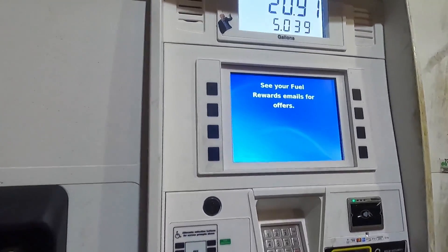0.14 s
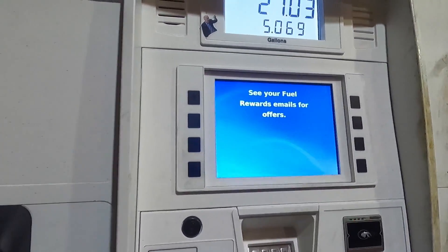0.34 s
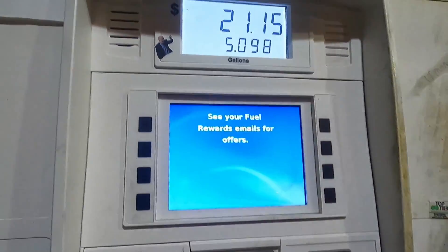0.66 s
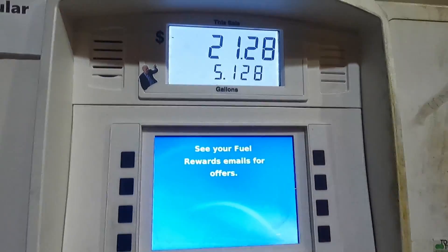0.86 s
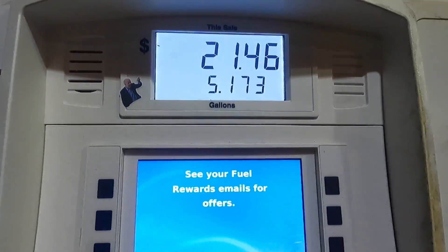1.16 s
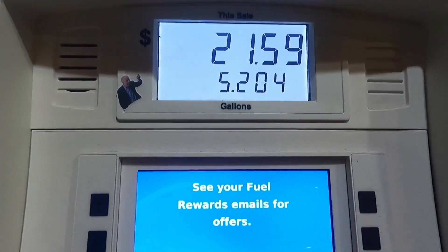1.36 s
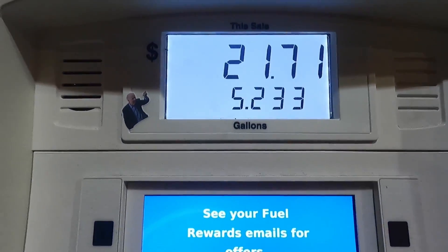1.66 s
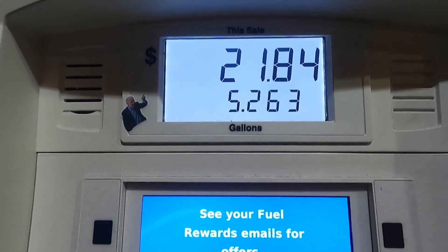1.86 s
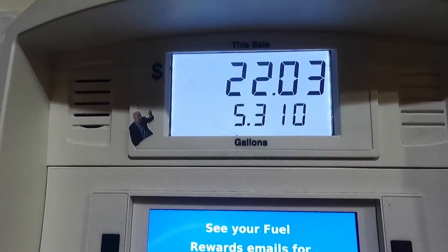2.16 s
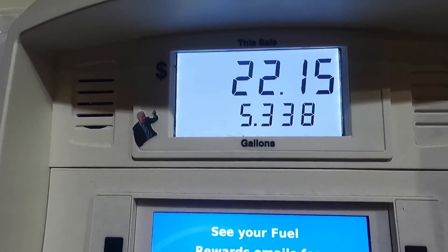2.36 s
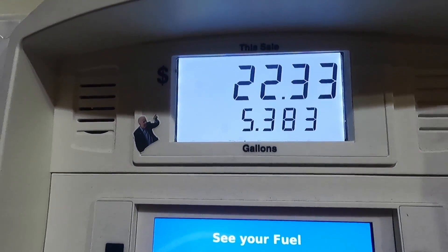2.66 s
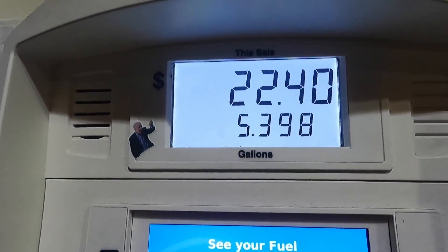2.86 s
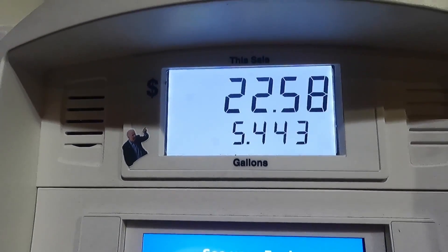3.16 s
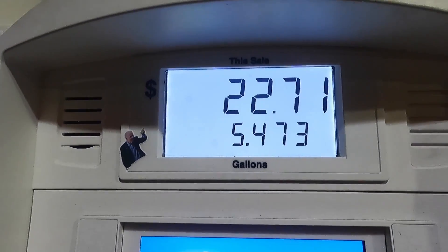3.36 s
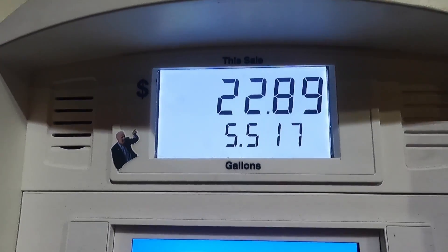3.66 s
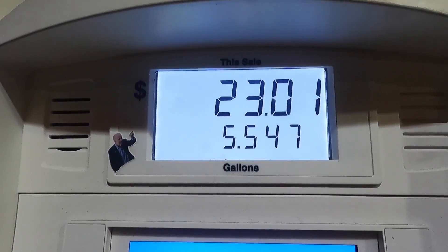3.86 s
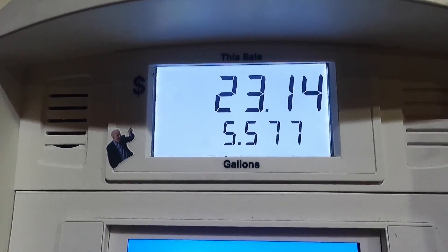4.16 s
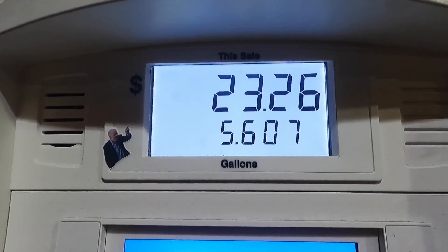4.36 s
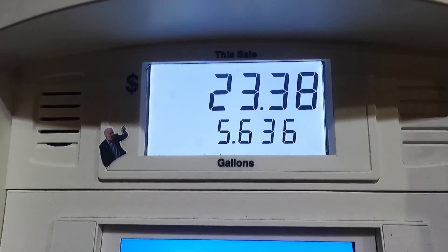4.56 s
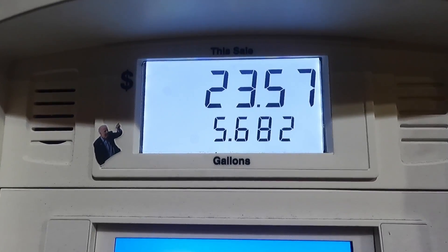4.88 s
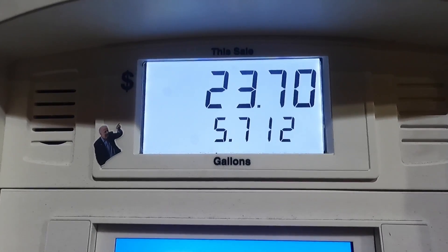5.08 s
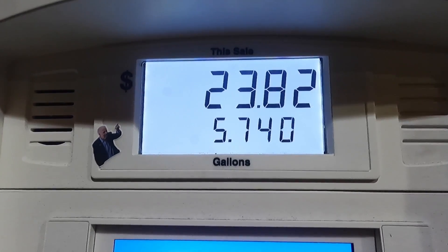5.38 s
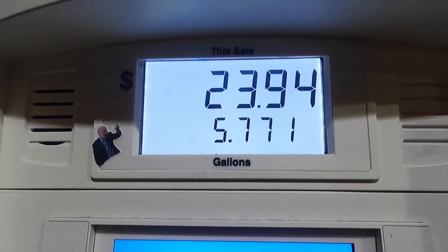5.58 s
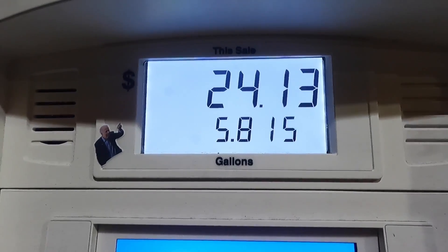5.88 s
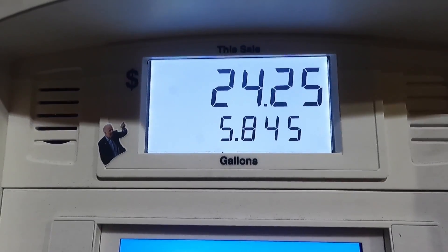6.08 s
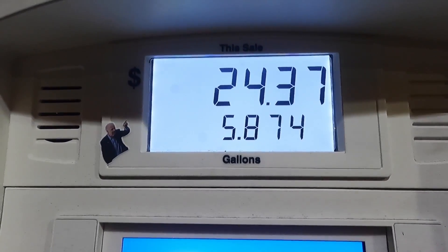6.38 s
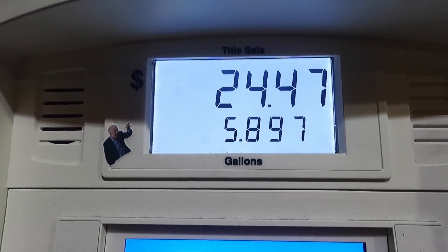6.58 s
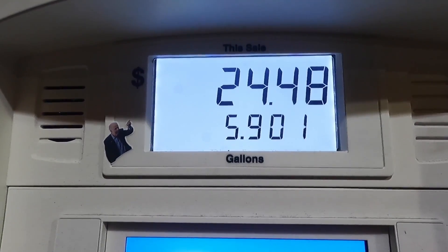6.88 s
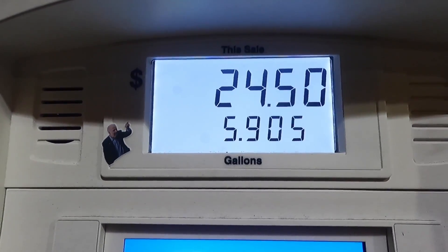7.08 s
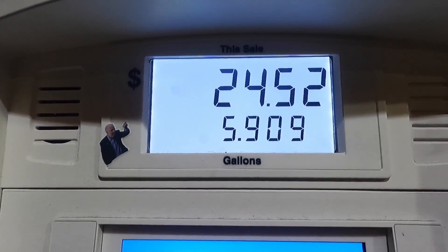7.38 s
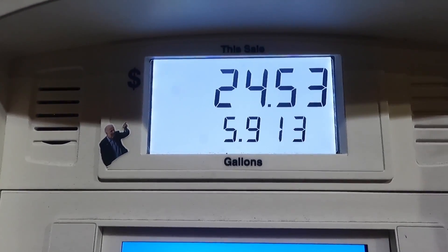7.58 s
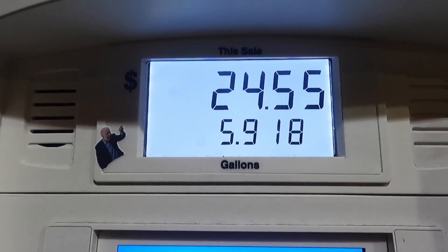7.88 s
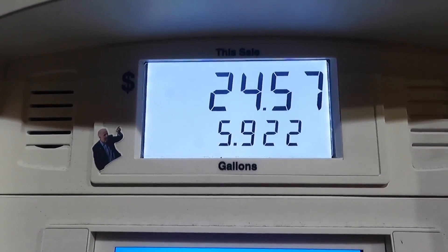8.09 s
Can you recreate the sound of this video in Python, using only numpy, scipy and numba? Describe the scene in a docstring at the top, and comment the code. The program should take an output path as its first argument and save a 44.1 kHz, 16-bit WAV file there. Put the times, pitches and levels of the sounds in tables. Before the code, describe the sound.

Low exhaust throbbing dominates, with soft fuel flow ringing through pipes close by. The engine slowly rises while a leak ticks, falls back into uneven thumps, and immediately revs again, louder and rougher with sharp metallic spits. Near the end the fuel flow narrows to a thin hiss, the throttle closes and the engine sputters down in loose chugs. Outdoor canopy, short reflections, muted distant rumble, close stereo pickup.

```python
"""Fuel pump beside a revving engine

A petrol pump fills a tank while a deep engine nearby revs up twice, dropping back into a lumpy burble each time.
The drone is a sum of orders of the four-stroke cycle, shaped by the pipe's resonances.
An exhaust leak lets out noise puffs, one tick a cycle at first, two spits a cycle in the second, harder pull.
Fuel noise rings the pipework and filler neck until the valve throttles to a thin hiss.
Coloured noise gives the station behind, and short noise bursts give two dull knocks on a panel."""
import sys
import numpy as np
from scipy import signal
from scipy.fft import rfft, irfft, next_fast_len
from scipy.io import wavfile
from scipy.ndimage import uniform_filter1d, map_coordinates
from numba import njit

SR = 44100
rng = np.random.default_rng(int(sys.argv[2]) if len(sys.argv) > 2 else 0)


def persist_wave(psi):
    """Save psi, clipped to +-1, as 16-bit WAV."""
    counts = np.round(np.clip(psi, -1, 1) * 32767).astype(np.int16)
    wavfile.write(sys.argv[1], SR, np.atleast_2d(counts).T)


N = 363384
T = np.arange(N) / SR  # time axis in s

# cylinders heard at the leak: place_in_cycle (0-1), tight_db, blowing_db
LEAKS = [(.02, 0, -17), (.18, -12, 0), (.42, -11, -15), (.745, -22, -1)]
# pulls on the throttle: opens_s, closes_s, drone_db, gas_db, blow_by (0-1), drone_fade_db_per_s once closed
PULLS = [(-.2, 3.54, -20, -50.5, 0.12, 21), (4.071, 6.87, -19.5, -39, 0.86, 32)]
OPEN_S = 0.073  # time the throttle takes to open


def undb(db):
    """Decibels to amplitude ratio."""
    return 10 ** (np.asarray(db) / 20)


def unit(x):
    """Normalise to an rms amplitude of 1."""
    return x / np.sqrt(np.mean(x ** 2))


def curves(table):
    """Linear interpolation of each column over the times in the first."""
    s, *columns = np.transpose(table)
    return [np.interp(T, s, c) for c in columns]


def response(hz, points):
    """Magnitude response interpolated in dB over log frequency."""
    f, db = np.transpose(points)
    return undb(np.interp(np.log(hz + 1e-9), np.log(f), db))


def colour(x, points):
    """Zero-phase filtering: the spectrum is multiplied by a magnitude response."""
    size = next_fast_len(N + 8192)
    gain = response(np.fft.rfftfreq(size, 1 / SR), points)
    return irfft(rfft(x, size) * gain, size)[..., :N]


def noise(like):
    """White noise in two channels whose correlation (0-1) is set by the mid and side shares."""
    mid, side = rng.standard_normal((2, N))
    like = np.clip(like, 0, 1)
    return np.sqrt((1 + like) / 2) * mid + np.sqrt((1 - like) / 2) * np.array([side, -side])


def walk(rate):
    """Slow random drift: cubic interpolation through random values, `rate` of them a second."""
    steps = rng.standard_normal(1024)
    drift = map_coordinates(steps, [T[::64] * rate], order=3, mode="wrap")
    return drift.repeat(64)[:N]


def ramp(start_s, length_s):
    """Linear rise from 0 to 1, held there afterwards."""
    return np.clip((T - start_s) / length_s, 0, 1)


def swell(s, half_s):
    """Gaussian hump of height 1, down to 1/e at half_s from its centre."""
    return np.exp(-((T - s) / half_s) ** 2)


def ring(x, decay_s):
    """Exponential decay: a one-pole filter gives every impulse a tail."""
    return signal.lfilter([1], [1, -np.exp(-1 / (decay_s * SR))], x + 1e-18)


def even(x, span_s):
    """Level equalisation: divide by the running rms, leaving pulses shorter than the span."""
    power = np.mean(np.atleast_2d(x) ** 2, axis=0)
    size = int(span_s * SR)
    return x / np.sqrt(uniform_filter1d(uniform_filter1d(power, size), size) + 1e-18)


def pulses(phase, scatter_db):
    """Pulse train: an impulse of random size at each whole turn of the phase."""
    at = np.flatnonzero(np.diff(np.floor(phase)) > 0)
    out = np.zeros(N)
    out[at] = undb(scatter_db * rng.uniform(-1.2, 1, 4096)[:len(at)])
    return out


@njit
def resonate(x, hz, width):
    """Second-order resonance: a state-variable band-pass with a moving centre."""
    y, band, low = np.empty(len(x)), 0., 0.
    for i in range(len(x)):
        g, k = np.tan(np.pi * hz[i] / SR), width / hz[i]
        v = (band + g * (x[i] - low)) / (1 + g * (g + k))
        band, low, y[i] = 2 * v - band, low + 2 * g * v, k * v
    return y


def steep(x, hz, width):
    """Cascaded resonance: each channel passes the same band-pass twice, at rms 1."""
    hz = hz * np.ones(N)
    return unit(np.array([resonate(resonate(c, hz, width), hz, width) for c in x]))


def station():
    """Diffuse background: distant traffic and machinery under the canopy blend into coloured noise."""
    # colour of the background: freq_hz, level_db
    wash = [(88, -20.5), (150, -7), (190, -11.5), (260, -19), (360, -13.5), (450, -23), (621, -22),
            (853, -22.5), (1150, -22), (2250, -38), (3910, -41.5), (7250, -51), (8150, -56.5),
            (10600, -73.5), (17900, -120)]
    return undb(-41.5 + 1.7 * walk(7.6)) * unit(colour(noise(like=0.88), wash))


def air():
    """Local turbulence: air stirring at the microphone ports gives uncorrelated low rumble."""
    # colour of the moving air: freq_hz, level_db
    rumble = [(15, 6), (30, -5.5), (70, 0.5), (150, -11), (400, -24.5), (2000, -83.5)]
    return undb(-56) * unit(colour(noise(like=0), rumble))


def knocks():
    """Impact excitation: decaying bursts of the panel's resonances, dull because it is struck softly."""
    # faint knocks: start_s, level_db
    strikes = [(2.487, -18), (2.796, -21.5)]
    # panel resonances: freq_hz, width_hz, level_db
    panel = [(487, 160, -4), (870, 210, 2), (1090, 220, -6), (1650, 1200, -2)]
    blows = np.zeros(N)
    for s, db in strikes:
        blows[int(s * SR)] = undb(db - 14.0)
    modes = unit(sum(undb(db) * steep(noise(like=0.77), hz, width) for hz, width, db in panel))
    rung = ring(blows, decay_s=0.018) * modes
    return signal.sosfilt(signal.butter(2, 2800, fs=SR, output="sos"), rung)


def pump():
    """Flow noise: turbulent fuel rings pipework and filler neck; the valve closes and hisses higher."""
    # the fill: time_s, rush_db in the pipework, neck_db of the air in the neck, neck_hz
    fill = [(0, -47, -47, 566), (.35, -42, -43.5, 547), (.8, -39.5, -45.5, 522), (1.5, -44.5, -41, 700),
            (2.6, -45, -43, 721), (3.7, -38.5, -43.5, 747), (4.5, -41, -43.5, 782), (5.3, -41.5, -43, 901),
            (6.1, -37, -44, 905), (6.5, -39, -51, 896)]
    # resonances of the throttled valve: freq_hz, width_hz, level_db
    valve = [(605, 56, -3), (800, 660, 2.5), (1156, 210, 1.5), (2220, 1600, -7)]
    valve_s, close_s = 6.47, .08  # start and length of the closing
    pan_db = 5  # hiss, left minus right
    shut = ramp(valve_s, close_s)
    rush_db, neck_db, neck_hz = curves(fill)
    rush = undb(rush_db + 1.3 * walk(25)) * steep(noise(like=0.94), 621, width=204)
    neck_hz = neck_hz * (1 + 0.018 * walk(9.8))
    neck = undb(neck_db + 1.6 * walk(40)) * steep(noise(like=0.99), neck_hz, width=173)
    hiss = unit(sum(undb(db) * steep(noise(like=0.5), f, w) for f, w, db in valve))
    hiss = hiss * undb(np.array([[pan_db], [-pan_db]]) / 2)
    hiss_db = -45.0 + 1.0 * (T - valve_s) + .4 * walk(3.2)  # grows by 1 dB a second
    return (1 - shut) * (rush + neck) + shut * undb(hiss_db) * hiss


def throttle():
    """Source control: each pull opens, holds and closes; drone and gas decay until the next takes over."""
    close_s = 0.2  # time the throttle takes to close
    drone_shut_db, gas_shut_db, gas_fade_db_per_s = -8, -3.5, 17.5
    build_from_db, build_s = -2, 0.11  # the leak starts weaker and builds up
    opening = blow = drone_gain = gas_gain = 0
    for opens, closes, drone_db, gas_db, blow_by, fade_db in PULLS:
        on, shut = ramp(opens, OPEN_S), ramp(closes, close_s)
        since = np.maximum(T - closes, 0)
        opening = opening + on * (1 - shut - opening)
        blow = blow + on * (blow_by * (1 - shut / 2) - blow)
        drone_level = undb(drone_db + drone_shut_db * shut - fade_db * since)
        drone_gain = drone_gain + on * (drone_level - drone_gain)
        build_db = build_from_db * np.exp(-np.maximum(T - opens, 0) / build_s)
        gas_level = undb(gas_db + build_db + gas_shut_db * shut - gas_fade_db_per_s * since)
        gas_gain = gas_gain + on * (gas_level - gas_gain)
    return opening, np.clip(blow, 0, 1), drone_gain, gas_gain


def coasting():
    """Overrun time: seconds since the throttle last began to close, zero during a pull."""
    out = np.zeros(N)
    for opens, closes, *_ in PULLS:
        out = out + ramp(opens, OPEN_S) * (np.maximum(T - closes, 0) - out)
    return out


def chugs():
    """Single-mode ringing: each overrun chug is a hump of one tone whose pitch moves from chug to chug."""
    # heavy chugs: centre_s, level_db, pitch_hz
    thumps = [(3.58, -19, 84), (3.655, -15, 77.7), (3.75, -14.5, 75.2), (3.83, -19.5, 68.2),
              (3.895, -12, 64.3), (3.974, -11.5, 56.2), (4.05, -15.5, 55.4), (4.109, -13.5, 57.4),
              (7.04, -20, 78.1), (7.12, -18, 77.7), (7.196, -28, 71.94), (7.33, -12.5, 69.56),
              (7.41, -22.5, 72), (7.47, -22, 56.46), (7.536, -15, 58), (7.63, -16, 65.85),
              (7.745, -18, 68.9), (7.83, -25, 62), (7.94, -23.5, 68.3), (8.09, -23, 57.8), (8.16, -24, 66)]
    times, _, pitches = np.transpose(thumps)
    turns = np.cumsum(np.interp(T, times, pitches)) / SR + rng.uniform()
    envelope = sum(undb(db) * swell(s, half_s=0.029) for s, db, _ in thumps)
    return envelope * np.sin(2 * np.pi * turns)


def burble(cycle):
    """Irregular pulse train: eight firings a cycle, of stray size and timing, excite the pipe."""
    # the pipe rung by stray firings: freq_hz, gain_db
    pipe = [(15, -50), (25, -23.5), (46, -3), (65, 0), (80, 1.5), (95, -2), (129, -10), (177, -11),
            (231, -17), (358, -26.5), (450, -44.5), (580, -74), (990, -120)]
    firings = pulses(8 * cycle + .25 * walk(70), scatter_db=1.5)
    gusts = ring(firings, decay_s=0.01) * rng.standard_normal(N)
    return even(colour(gusts, pipe), span_s=0.028)


def wall(gas, dull):
    """Structural resonance: the pipe wall adds its modes to the gas; weak pressure dulls the treble."""
    # wall resonances round the leak: freq_hz, width_hz, level_db
    modes = [(1720, 360, -6), (3650, 100, -11), (3000, 19, -11.5), (4174, 120, -4.5), (4660, 110, -4),
             (4840, 24, -5), (5860, 81, -3.5), (6920, 18, 0)]
    rung = gas
    for hz, width, db in modes:
        rung = rung + undb(db) * np.array([resonate(c, np.full(N, float(hz)), width) for c in gas])
    soft = signal.sosfiltfilt(signal.butter(2, 4480, fs=SR, output="sos"), rung)
    return unit(rung + np.clip(dull, 0, 1) * (soft - rung))


def echoes(x, count=7):
    """Comb filtering: early reflections off the car and pump housing, at slowly swaying lags."""
    first_s, last_s, drift_s, echo_db = .0012, .011, .0003, -14  # each echo has this level
    out = x
    for lag_s in rng.uniform(first_s, last_s, count):
        late = T - lag_s - drift_s * walk(2)
        out = out + undb(echo_db) * np.array([np.interp(late, T, c) for c in x])
    return unit(out)


def chinks(puffs, ring_hz, spread=0.423, count=6):
    """Modal ringing: every puff rings the thin metal at random pitches, the highest weakest."""
    t = np.arange(1024) / SR
    out = np.zeros(N + 1024)
    shape = np.exp(-t / .0034) * (1 - np.exp(-t / .0006))
    at = np.flatnonzero(puffs)
    for i, chance in zip(at, rng.standard_normal((len(at), count, 1))):
        hz = ring_hz[i] * np.exp(spread * np.tanh(chance))
        size = 1 / (1 + (hz / 6800) ** 10)
        out[i:i + len(t)] += puffs[i] * shape * np.sum(size * np.sin(2 * np.pi * hz * t), axis=0)
    return unit(out[:N])


def leak(cycle, blow, load):
    """Pulsed jet noise: each leaking cylinder lets out a short puff, trailed by the canopy's longer tail."""
    # colour of the gas when tight: freq_hz, level_db
    tick = [(590, -49), (1000, -10.5), (1560, -3.5), (2700, -9.5), (3510, -8.5), (4150, -12.5),
            (5540, -20.5), (6960, -21), (8150, -32), (10600, -38), (17900, -120)]
    # colour of the gas when blowing: freq_hz, level_db
    spit = [(590, -19), (1000, -3.5), (1510, -9), (1830, -6), (2490, -6), (2700, -3), (4860, -4),
            (5840, -10.5), (6430, -17.5), (6960, -11.5), (8150, -25.5), (10600, -38.5), (17900, -120)]
    puffs = 0
    for place, tight_db, blowing_db in LEAKS:
        size = undb(tight_db + blow * (blowing_db - tight_db))
        puffs = puffs + pulses(cycle - place, scatter_db=2.1) * size
    direct = unit(ring(ring(puffs, decay_s=.0042), decay_s=.001))
    tail = unit(ring(ring(puffs, decay_s=0.018), decay_s=0.00093))
    # powers add: direct puffs, their tail (weaker under load) and a steady hiss
    envelope = np.sqrt(direct ** 2 + (undb(6 - 5 * load) * tail) ** 2 + undb(0.5) ** 2)
    gas = envelope * noise(like=0.51)
    gas = (1 - blow) * unit(colour(gas, tick)) + blow * unit(colour(gas, spit))
    ring_hz = 3661 + 1313 * load ** 2 * blow  # the metal's pitch rises with load and blow-by
    metal = undb(-7.5 + 4 * load) * chinks(puffs, ring_hz)
    return even(gas + metal, span_s=0.47)


def spits(crack_db=-14.0, ring_db=-9.5, decay_s=0.0051):
    """Transient jet: a hard puff is a crack coloured by the pipe wall, two rings of metal and a canopy tail."""
    # the sharpest spits: start_s, level_db, ring_hz
    bursts = [(0.8478, -34, 3100), (1.0151, -44, 2290), (1.1862, -36, 2200), (1.352, -33, 4000),
              (1.4336, -34, 4400), (1.5145, -36, 4220), (1.597, -26, 3620), (1.758, -40, 4400),
              (1.8367, -43, 4200), (1.994, -37, 4140), (2.0715, -31.5, 2560), (2.1454, -35, 2540),
              (2.295, -35, 2560), (2.368, -32.5, 3370), (2.856, -31.5, 3770), (3.056, -32, 3560),
              (4.301, -24, 5230), (4.655, -25, 3770), (5.205, -25, 4500), (5.4934, -23, 4220),
              (5.721, -17.5, 5670), (5.8714, -18.5, 4980), (6.1799, -23, 5180), (6.236, -22.5, 3000),
              (6.4573, -18, 5310), (6.512, -14.5, 4320), (6.544, -17, 4920), (6.567, -15.5, 5020),
              (6.5987, -17, 4730), (6.621, -16, 4800), (6.6523, -17, 5060), (6.676, -16.5, 3360),
              (6.7056, -19, 4780), (6.783, -20, 5000), (6.919, -27, 3880), (6.941, -25, 3450),
              (6.9688, -22, 3830), (6.9905, -25, 3170), (7.0165, -26, 3580), (7.0379, -33, 3215),
              (7.1402, -39, 2260), (7.2659, -33, 2840), (7.319, -32, 5000), (7.3746, -29.5, 2780),
              (7.394, -33, 3260), (7.4325, -31, 2293), (7.4869, -32.5, 2230), (7.549, -38, 2490),
              (7.675, -35.5, 4506)]
    # colour of the crack: freq_hz, level_db
    crack_colour = [(1000, -33), (2500, -5.5), (5000, 4.5), (7500, -6), (8600, -17.5), (12000, -30),
                    (15000, -49)]
    tail_db, tail_s = -13.5, 0.025
    upper_ratio, upper_db = 1.27, -7.5  # second ring of the metal
    crack = wall(colour(noise(like=0.8), crack_colour), dull=0)
    out = np.zeros((2, N))
    t = np.arange(4096) / SR
    attack = 1 - np.exp(-t / .0003)
    burst = attack * np.exp(-t / decay_s)
    tail = attack * undb(tail_db) * np.exp(-t / tail_s)
    for s, db, hz in bursts:
        at = slice(int(s * SR), int(s * SR) + len(t))
        metal = np.sin(2 * np.pi * hz * t) + undb(upper_db) * np.sin(2 * np.pi * hz * upper_ratio * t)
        snap = undb(crack_db) * np.hypot(burst, tail) * crack[:, at]
        out[:, at] += undb(db) * (snap + undb(ring_db) * burst * metal)
    return out


def drone(hz, cycle, load, blow, smear=0.1624):
    """Source and filter: orders of the firing cycle slide through the fixed resonances of the pipe."""
    # lopsided firing: order (multiple of cycle rate), idle_db, third_load_db, two_thirds_load_db, full_load_db
    firing = [(2, -3, -5.5, -3.5, 6.5), (3, 4, 9, 1, 1.5), (4, -0.5, 6.5, 8, 9), (5, 16.5, 13, 8, -3.5),
              (6, -9.5, -4, -27.5, -22.5), (7, 4, -8, -3, -5.5), (8, -23, -7.5, -12, -19.5),
              (9, -14.5, -8.5, -0.5, 0.0), (10, -13, -5.5, -22, -7), (11, -14.5, -10.5, -9.5, 7.5),
              (12, -14, -3.5, -6, 9), (13, -20, -10, -9, -9.5), (14, -6.5, -3, 5.5, 5),
              (15, -20.5, 5.5, -4.5, 2), (16, -12.0, -10.5, -10, 7.0), (17, -9.5, -2.5, 1.5, 4.5),
              (18, -11.5, -1, -8.5, -2.5), (19, -14, 1, -12.5, -0.5), (20, -12.5, -4.5, -5.5, 5.5)]
    # exhaust pipe response: freq_hz, gain_db
    pipe = [(25.0, -32), (45.0, -21.0), (58.0, -9.5), (70.0, -7), (80.0, -8), (92.0, -2.5), (105.0, 3),
            (122.0, 1.0), (140.0, -4), (152.0, -8.5), (170.0, -7), (195.0, -16.0), (215.0, -22.5),
            (240.0, -23.5), (265.0, -35), (300.0, -27), (400.0, -34.5)]
    # swells and dips of the pipe's boom: centre_s, half_s, change_db
    booms = [(5.133, 0.14, 7.5), (5.546, 0.12, -10), (5.892, 0.2, 9.5)]
    boom_hz, boom_width_hz = 152, 9.4
    boom_db = sum(db * swell(s, half_s) for s, half_s, db in booms)
    out = 0
    for k, *levels_db in firing:
        k = round(k)
        order_hz = k * hz
        # the orders line up on the loudest cylinders, so each thump comes with its tick
        tight, blowing = (sum(undb(row[c]) * np.exp(-2j * np.pi * k * row[0]) for row in LEAKS)
                          for c in (1, 2))
        angle = np.angle(tight) + np.clip(2 * blow, 0, 1) * np.angle(blowing / tight)
        # the pipe rings on after a thump and holds the higher orders back
        lag = np.arctan((order_hz - 50) / 25) - np.pi / 4 + smear * (1 - 0.629 * blow) * (k - 5) ** 2
        boom = boom_db / (1 + ((order_hz - boom_hz) / boom_width_hz) ** 4)
        waver = .09 * k * walk(5)  # dB
        level_db = np.interp(load, np.linspace(0, 1, len(levels_db)), levels_db)
        size = undb(level_db + boom + waver) * response(order_hz, pipe)
        out = out + size * np.cos(2 * np.pi * k * cycle + angle - lag)
    return out


def engine():
    """Common periodicity: one crank phase times drone, burble and leak; chugs, flow and roar join them."""
    # engine speed: time_s, cycle_hz (four-stroke cycles per second)
    speed = [(0, 11.376), (.27, 11.844), (.72, 12.03), (1.05, 11.796), (1.86, 12.602), (2.85, 14.833),
             (3.58, 16.277), (3.8, 12.85), (4.05, 11.6), (4.26, 14.8), (4.35, 14.895), (4.6, 15.069),
             (4.97, 16.624), (5.58, 17.637), (5.93, 17.306), (6.95, 19.042), (7.48, 14.243), (8.24, 11.909)]
    # engine load: time_s, load (0-1)
    load_curve = [(0, 0), (1.2, 0.1), (2, 0.26), (2.7, .31), (3.4, 0.5), (4.3, .33), (4.75, 0.3),
                  (5.15, .72), (5.9, 0.9), (6.35, 1)]
    # the exhaust's roar under load: freq_hz, level_db
    roar_colour = [(120, -19.5), (200, 5.5), (245, -1.5), (275, -11), (310, 1.5), (370, -4.5), (440, -19.5),
                   (700, -41), (3000, -110)]
    # gas flowing through the pipe on throttle: freq_hz, level_db
    flow_colour = [(30, -21.5), (50, -9.5), (70, -8.5), (110, 0.5), (170, 0), (225, -5.5), (280, -16),
                   (450, -46), (1000, -100)]
    # flares of the escaping gas: centre_s, half_s, gain_db
    flares = [(0.054, 0.073, 8), (1.498, 0.15, 2), (2.254, 0.46, 2), (5.448, 0.16, 3)]
    (hz,), load = curves(speed), np.clip(curves(load_curve)[0], 0, 1)
    opening, blow, drone_gain, gas_gain = throttle()
    cycle = np.cumsum(hz) / SR
    revs = hz - 15  # cycles per second above the middle speed
    steady = drone_gain * drone(hz, cycle, load, blow)
    # stray firings sink on throttle, grow with speed and thin out as the engine coasts
    stray_db = -21.5 - 21 * opening + 0.25 * revs - 6.5 * coasting()
    stray = undb(stray_db) * burble(cycle)
    roar = undb(-41.5) * opening * load ** 3 * unit(colour(noise(like=0.9), roar_colour))
    flow = undb(-40) * opening * unit(colour(noise(like=1.0), flow_colour))
    flare_db = sum(db * swell(s, half_s) for s, half_s, db in flares)
    # a blowing leak loses its top at light load and below the middle speed
    dull = blow * (0.64 * (1 - load) + 0.22 * np.maximum(-revs, 0))
    gas = echoes(wall(leak(cycle, blow, load), dull))
    gas = gas_gain * undb(0.38 * revs + flare_db) * gas
    return steady + stray + chugs() + flow + roar + gas


def scene():
    """Superposition: the pressures of all the sources add."""
    return engine() + spits() + pump() + knocks() + station() + air()


def record(dry, ceiling=0.69):
    """Soft saturation rounds the loudest peaks; an elliptic low-pass cuts the top of the treble."""
    rounded = dry / (1 + (dry / ceiling) ** 4) ** .25
    low_pass = signal.ellip(8, .1, 50, 14900, fs=SR, output="sos")
    return ramp(0, .004) * signal.sosfiltfilt(low_pass, rounded)


dry = scene()
out = record(dry)
persist_wave(out)
```